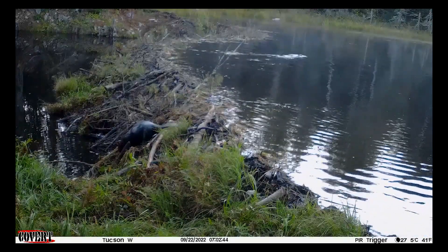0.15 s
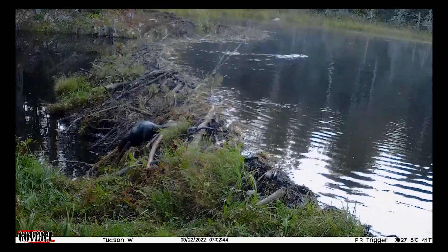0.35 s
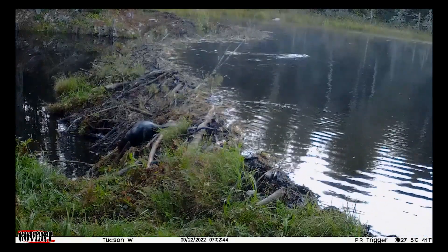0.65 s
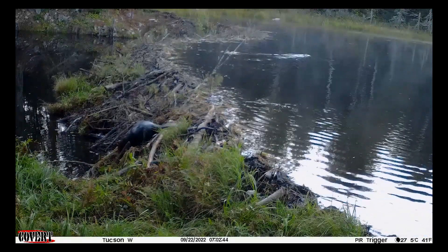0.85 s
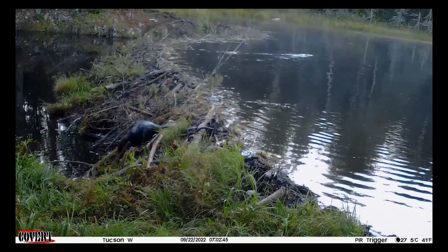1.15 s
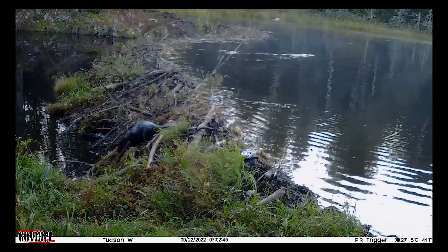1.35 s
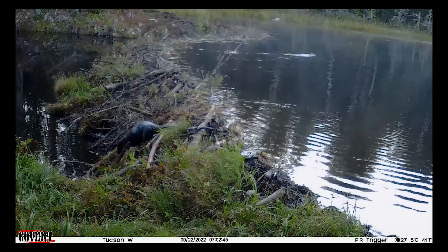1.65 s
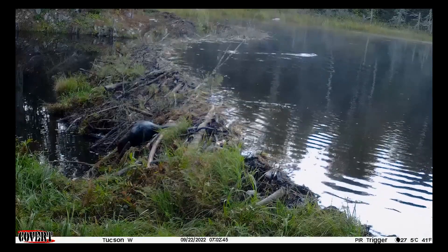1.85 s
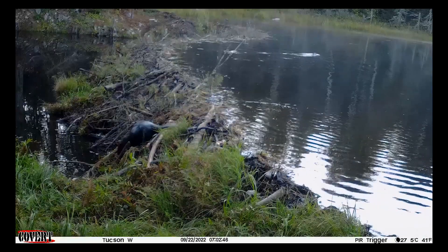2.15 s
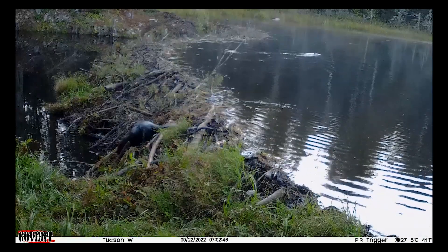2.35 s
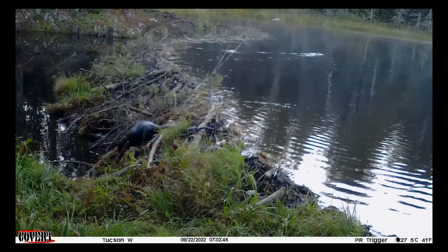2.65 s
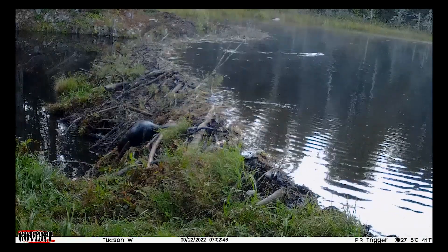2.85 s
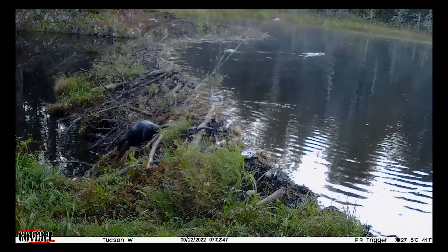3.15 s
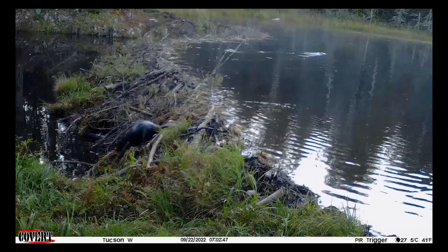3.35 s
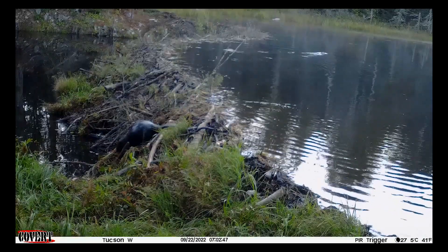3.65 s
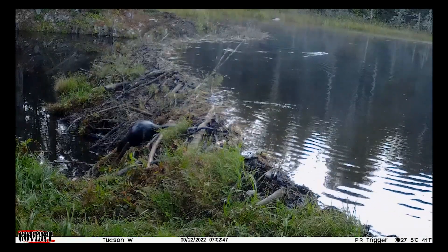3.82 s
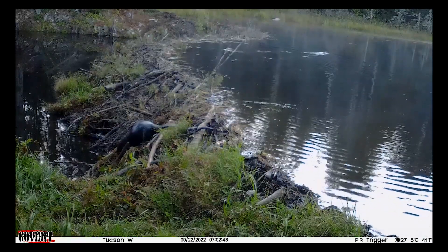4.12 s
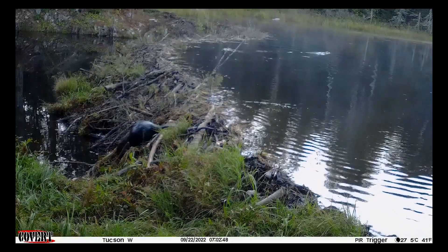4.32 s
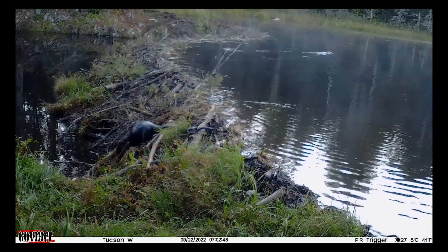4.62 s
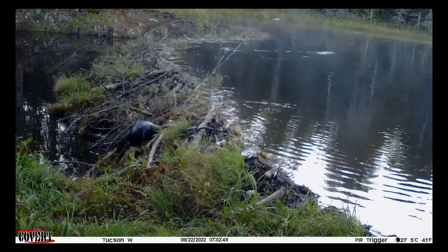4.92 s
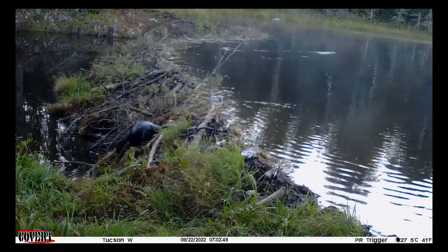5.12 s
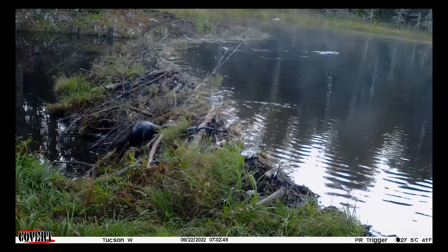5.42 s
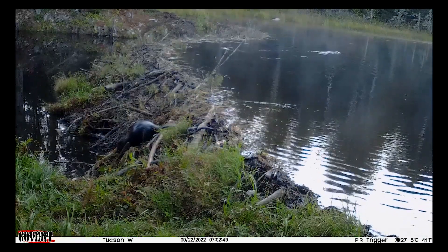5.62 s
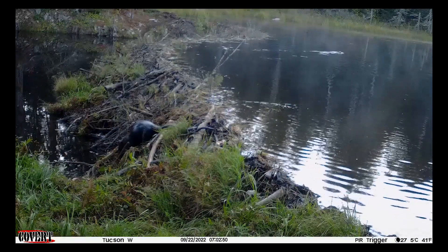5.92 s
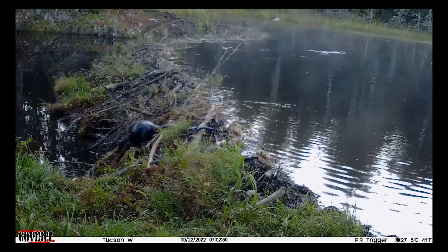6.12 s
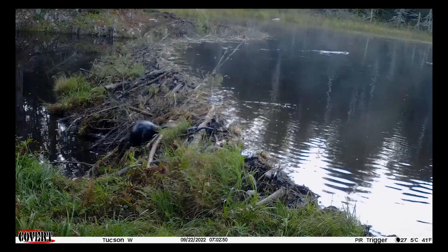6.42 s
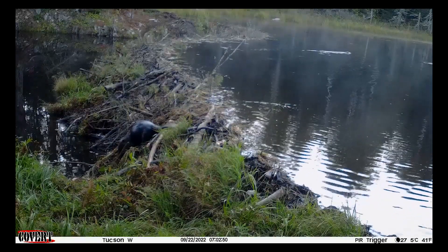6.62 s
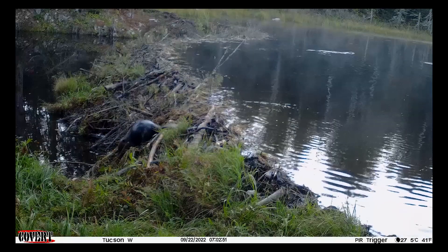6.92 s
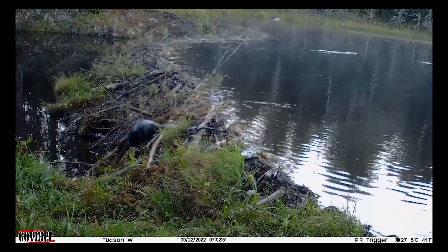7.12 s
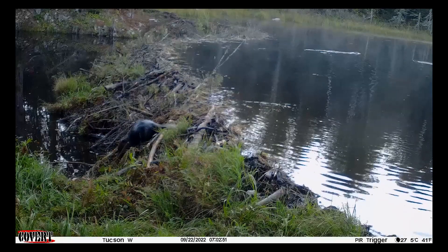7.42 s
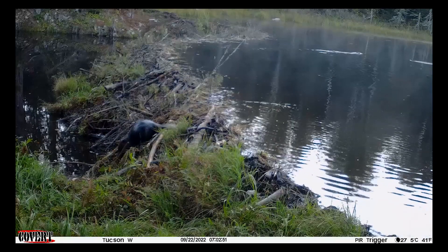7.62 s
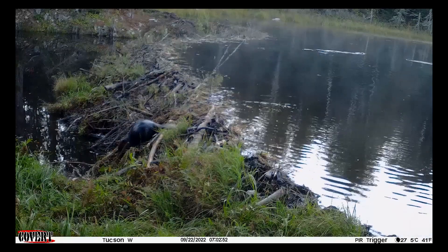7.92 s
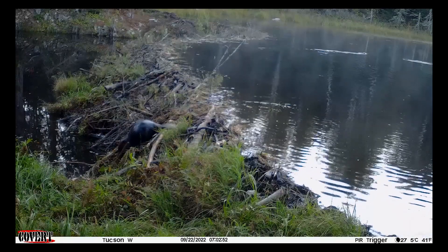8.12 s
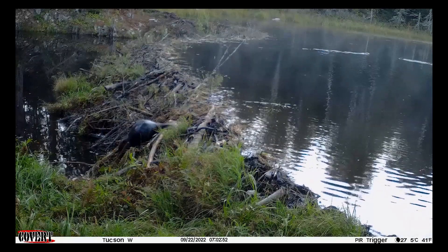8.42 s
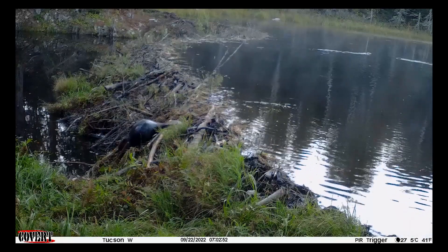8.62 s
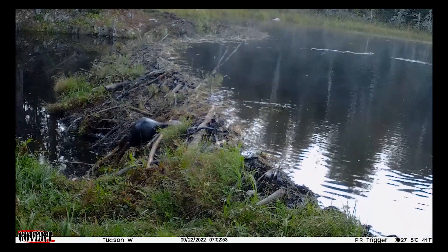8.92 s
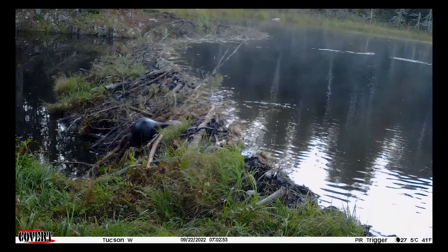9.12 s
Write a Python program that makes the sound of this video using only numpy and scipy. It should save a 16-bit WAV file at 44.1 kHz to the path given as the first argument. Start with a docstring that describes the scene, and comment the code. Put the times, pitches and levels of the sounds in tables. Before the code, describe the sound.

Geese give low growls snapping into sharp honks beside a wooded pond, while tree frogs trill in quick rising chirps over a soft low rumble.

```python
"""Geese growl and honk across a wooded pond while four tree frogs trill in rising chirps.
Goose voices are harmonic series, coloured by throat resonances and roughened by uneven membrane beats.
Frog chirps are short upward glides of three partials, with early echoes from a bank.
The trees return a long diffuse echo, by convolution with decaying random taps.
A low rumble in two layers and a faint hiss, both of shaped noise, lie under all."""
import sys
import numpy as np
from scipy import signal
from scipy.io import wavfile
from scipy.ndimage import uniform_filter1d

SR = 44100
rng = np.random.default_rng(int(sys.argv[2]) if len(sys.argv) > 2 else 0)


def waveform_to_disk(signal):
    """Save audio, clipped to [-1, 1], as 16-bit WAV at the path in sys.argv[1]."""
    frames = np.transpose(np.atleast_2d(signal))
    scaled = np.clip(frames, -1, 1) * 32767
    samples = np.round(scaled).astype(np.int16)
    wavfile.write(sys.argv[1], SR, samples)


N = 408807  # samples

# Low growls, mostly leading into a honk:
# (start t/s, length/s, pitch f/Hz at no rise, pitch f/Hz at full rise, effort level/dB)
GROWLS = [(.01, 0.27, 125.4, 154.1, -50.5), (2.22, .29, 124, 150, -49), (4.63, 0.29, 127, 155.9, -51),
          (6.19, .19, 140.2, 162.3, -49), (7.88, 0.26, 125.7, 150.3, -52)]
# Throat resonances of the growl: (f/Hz, level/dB)
GROWL_THROAT = [(250, -53), (450, -16.5), (600, -17.5), (740, -24.5), (860, -2), (980, 3.5), (1080, -2),
                (1160, -13.5), (1300, 4.5), (1450, -14.5), (1650, -63), (2080, -27), (2600, -51),
                (3900, -23), (5000, -54)]
# Course of every growl:
# (share of length, share of pitch rise, level/dB re effort, brightness/dB per octave)
GROWL_COURSE = [(0, 0.051, -27, -11), (.3, 0.011, -14.5, -3), (.5, .4, -9.5, 1.5), (.82, .8, -4.5, -0.5),
                (.92, 0.93, -1.5, -2.5), (.97, 1, 9, -2), (1, .98, 3, -4)]
GROWL_ROUGH = 0.19  # roughness, 0-1
GROWL_WAVER, GROWL_WAVER_HZ = 0.015, 13.65  # pitch waver: share of the pitch, rate f/Hz

# Honks of the higher goose:
# (start t/s, length/s, reference top pitch f/Hz, pitch arch/Hz, effort level/dB)
HIGH_HONKS = [(.268, .11, 651, 130, -26), (2.46, .08, 581, 14, -39.5), (2.497, 0.12, 656.6, 114, -26),
              (4.908, 0.12, 662, 127, -25.5), (6.345, .085, 674, 70, -45.5), (8.142, 0.089, 641, 47, -27)]
# Throat resonances of the higher goose: (f/Hz, level/dB)
HIGH_THROAT = [(500, -14), (700, -35.5), (1050, -0.5), (1300, 0), (1800, -31.5), (2000, -23.5),
               (2500, -42.5), (3150, -39.5), (3550, -41.5), (3850, -26), (4250, -28.5), (4550, -43.5),
               (5150, -44.5), (6000, -45.5)]
# Course of every high honk: (share of length, share of the arch under the top,
# level/dB re effort, roughness 0-1, brightness/dB per octave)
HIGH_COURSE = [(0, 0.43, -20, 0.4, -5), (.12, 0.397, -8.5, 0.24, 1.5), (.28, 0.16, -0.5, 0.18, 2),
               (.45, 0.0091, -0.5, 0.1, -2.5), (.63, 0.13, -2.5, 0.09, 1.5), (.8, 0.83, -19.5, 0, -7),
               (1, 1.1, -28, .2, -9)]

# Honks of the lower goose, one curve each: (t/s, pitch f/Hz, effort level/dB, roughness 0-1)
LOW_HONKS = [
    [(2.76, 418.7, -35, .1), (2.795, 438.4, -26, .25), (2.82, 446, -24, 0.42), (2.83, 438.5, -34.5, 0.3),
     (2.842, 476, -25, 0.6), (2.848, 480, -29, 0.7)],
    [(2.842, 502, -36, 0.5), (2.858, 521, -31, 0.24), (2.87, 506, -31.5, .25), (2.876, 502, -44, 0.5),
     (2.9, 478, -56, .4)],
    [(6.708, 432, -50, .5), (6.728, 424, -36, 0.4), (6.745, 382, -51, 0.4), (6.79, 354, -63, .1)],
    [(6.859, 442.5, -33, .06), (6.87, 433, -29, 0.15), (6.905, 451.1, -23, 0.15), (6.93, 456, -27, 0.42),
     (6.945, 452, -25, 0.66), (6.96, 432, -38, 0.8), (6.966, 430, -30.5, 0.5), (6.988, 444, -56, .5)],
]
# Partials of the lower goose: (multiple of the pitch, level/dB)
LOW_PARTIALS = [(1, -24.5), (2, 2.5), (3, -22), (4, -34), (5, -27), (6, -26), (7, -27), (8, -22), (9, -23),
                (10, -34), (11, -33), (12, -71), (13, -42.5), (14, -58), (15, -45), (16, -53.5), (17, -50),
                (18, -64), (19, -51), (20, -73)]
# One deep honk: (t/s, pitch f/Hz, effort level/dB, roughness 0-1)
DEEP_HONKS = [
    [(6.63, 307.6, -60, .5), (6.646, 302.4, -43.5, 0.34), (6.694, 310, -41, 0.98),
     (6.725, 322.5, -39.5, 0.69)],
]
# Partials of the deep honk: (multiple of the pitch, level/dB)
DEEP_PARTIALS = [(1, -11), (2, -10.5), (3, -1), (4, -13), (5, -28), (6, -20.5), (7, -17.5), (8, -27),
                 (9, -24), (10, -23.5), (11, -29), (12, -23.5), (13, -34), (14, -30)]
# Brightness/dB per octave that each honk gains at full roughness
LOW_STRAIN_DB = (6.1, 6.5, 2, 1)
DEEP_STRAIN_DB = (2,)

# Soft murmurs with one throat resonance: (start t/s, length/s, first pitch f/Hz, last pitch f/Hz,
# pitch arch/Hz, effort level/dB, resonance f/Hz, share of length at the peak)
MURMURS = [(1.49, 0.25, 131.4, 142, 23.6, -55, 993, 0.65),
           (1.715, 0.051, 174.5, 165.4, 1.5, -51, 1110, 0.35),
           (6.64, 0.092, 102.9, 104, .3, -47, 820, 0.88), (6.783, .045, 101, 106, .3, -53, 860, 0.37),
           (7.045, 0.064, 178.2, 165.8, 1.5, -40.5, 1187, .25)]
MURMUR_WIDTH_HZ, MURMUR_ROUGH = 90, 0.58  # resonance width f/Hz, roughness 0-1
MURMUR_RISE_DB, MURMUR_FALL_DB = -7, -4  # level/dB at the start and end, under the peak
MURMUR_SAG = 0.023  # the resonance sinks by this share
FLUTTER_HZ, FLUTTER_DB = 71.8, 3  # throb of rough partials: rate f/Hz, greatest swing level/dB

# Trills of the near, second, thin and far frog: (opening chirp t/s, second chirp t/s,
# last chirp t/s, chirps after the opening, opening level/dB, peak level/dB)
TRILLS = [
    [(.632, .679, 1.124, 11, -35, -33.5), (3.118, 3.164, 3.613, 11, -34, -34),
     (5.311, 5.359, 5.806, 11, -36.5, -33.5), (8.153, 8.197, 8.644, 11, -32, -33.5)],
    [(.598, .648, 1.171, 11, -42, -43), (5.843, 5.89, 6.47, 12, -40, -42),
     (9.162, 9.216, 9.263, 2, -47.5, -41.5)],
    [(2.351, 2.41, 3.001, 11, -46.5, -45.5), (7.941, 7.999, 8.585, 11, -50, -50)],
    [(3.715, 3.771, 4.205, 9, -56.5, -54.5)],
]
# Opening chirp of each frog: (overtone level/dB, share of the sweep left out at its start)
OPENINGS = [(-12, .4), (-6, .1), (-6.5, 0.104), (-3, .1)]
# Voice of each frog: (start f/Hz, end f/Hz, rise/s, fall/s, level/dB of partials 1-3,
# their change/dB over the sweep, bank echoes as (delay/s, level/dB on partials 1-3),
# level/dB of partials 1-3 toward the trees)
FROG_VOICES = [(848, 1177, .017, 0.004, (1, -6, -27.5), (0, -11, 5.7), ((.0125, -23, -2, -6.5),
               (.024, -20.5, -10, -20)), (-13.5, -9.5, -28)), (843.4, 1080, 0.019, 0.0021, (-2, 0, -17),
               (0, 0, 0), ((.012, -33, -21, -21),), (-2, -7, -35.5)),
               (946, 1140, 0.025, 0.0035, (-6, 0, -26), (0, 0, 0), ((.012, -10, -10, -16),),
               (-13, -9.5, -36)), (884, 1150, 0.018, 0.0055, (0, -11, -30), (0, 0, 0),
               ((.012, -24, -19, -12),), (-5, -6, -38))]
# Vocal sac, acting on the overtones: (f/Hz, level/dB)
VOCAL_SAC = [(1650, -15), (1900, 1.5), (2150, -2.5), (2400, -3.5), (2700, -8.5), (3250, -1.5), (3700, 0)]
SLOWING = 0.04  # the first gaps are about this share shorter than the mean, the last ones longer
CHIRP_SPREAD_DB, OVERTONE_SPREAD_DB = 1, 0.8  # standard deviation/dB from chirp to chirp
BANK_TILT_DB = 14  # the bank returns the top of each sweep's overtones more strongly

# Late decay among the trees: (f/Hz, t60/s)
TREES = [(400, 2.7), (900, 2.38), (1300, 2), (2000, 1.98), (4000, 1.9), (8000, 1)]
# Colour of the tree echo: (f/Hz, level/dB)
TREES_COLOUR = [(400, 3), (900, -5), (1300, -3), (2000, 5.5), (4000, 1), (8000, 4)]
# Far shore: (delay/s, spread/s, level/dB over the scatter of the trees)
SHORE_ECHO = (0.16, 0.015, 1.8)
GEESE_TREES_DB = -7.5  # goose sound sent to the trees, level/dB

# Swells of the rumble: (t/s, upper level/dB, deep level/dB)
RUMBLE_LEVEL = [(0.04, -44.5, -44), (0.06, -42, -47.5), (0.4, -40, -43.5), (1.78, -51.5, -51.5),
                (2.12, -43, -46), (2.88, -47.5, -47.5), (5.37, -47, -46), (5.94, -36.5, -37),
                (5.96, -41, -47.5), (6.48, -46, -40.5), (6.63, -44.5, -48), (7.22, -46.5, -45.5),
                (7.58, -38.5, -40), (7.79, -43.5, -48.5), (8.2, -43.5, -41.5), (9.04, -39.5, -55),
                (9.17, -38.5, -40), (9.25, -42.5, -47)]
# Relative spectrum of the upper rumble: (f/Hz, level/dB per Hz)
RUMBLE = [(41, -34), (70, 3), (151, 0.5), (186, -6.5), (258, -21.5), (400, -34), (520, -51), (880, -120)]
# Relative spectrum of the deep rumble: (f/Hz, level/dB per Hz)
DEEP_RUMBLE = [(7.1, -28), (12, -4.5), (32, 5.5), (70, -2.5), (91, -36), (150, -120)]
# Relative spectrum of the hiss: (f/Hz, level/dB per Hz)
HISS = [(150, -51), (250, -5.5), (324, -9.5), (709, -14), (787, -15.5), (889, -5.5), (936, -7),
        (1300, -14.5), (1520, -20), (2160, -16), (2480, -20), (4100, -19.5), (6790, -23.5), (14800, -24),
        (15900, -27)]
HISS_DB, EDGE_HZ = -61, 15750  # hiss rms level/dB, upper band limit f/Hz


def geese():
    """Superposition: all growls, murmurs and honks add linearly."""
    out = np.zeros(N)
    for calls, voice in ((GROWLS, growl), (MURMURS, murmur), (HIGH_HONKS, high_honk)):
        for start, *call in calls:
            add(out, start, voice(*call))
    low = (LOW_HONKS, LOW_STRAIN_DB, LOW_PARTIALS)
    deep = (DEEP_HONKS, DEEP_STRAIN_DB, DEEP_PARTIALS)
    for honks, strains, partials in (low, deep):
        for rows, strain_db in zip(honks, strains):
            add(out, rows[0][0], honk(rows, strain_db, partials))
    return out


def growl(length, first_hz, last_hz, effort_db):
    """Source and filter: the partials of slow beats slide through a fixed throat."""
    risen, under_db, bright_db = course(GROWL_COURSE, length)
    waver = np.sin(2 * np.pi * (GROWL_WAVER_HZ * np.arange(len(risen)) / SR + rng.random()))
    hz = (first_hz + (last_hz - first_hz) * risen) * (1 + GROWL_WAVER * waver)

    def partial_db(k):
        throat_db = read(GROWL_THROAT, k * hz)
        return effort_db + under_db + throat_db + bright_db * np.log2(k / 7)

    return syrinx(hz, GROWL_ROUGH, partial_db, count=30)


def high_honk(length, top_hz, arch_hz, effort_db):
    """Register break: a pitch about four times the growl's, coloured by a fixed throat."""
    low, under_db, rough, bright_db = course(HIGH_COURSE, length)
    hz = top_hz - arch_hz * low

    def partial_db(k):
        throat_db = read(HIGH_THROAT, k * hz)
        return effort_db + under_db + throat_db + bright_db * np.log2(max(k / 2, 1))

    return syrinx(hz, rough, partial_db, count=9)


def honk(rows, strain_db, partials):
    """Spectral tilt under strain: roughness of the voice also lifts its upper partials."""
    hz, effort_db, rough = columns(rows)
    top = max(db for _, db in partials)

    def partial_db(k):
        tilt_db = strain_db * rough * np.log2(max(k / 2, 1))
        return effort_db + partials[k - 1][1] - top + tilt_db

    return syrinx(hz, rough, partial_db, count=len(partials))


def murmur(length, first_hz, last_hz, arch_hz, effort_db, throat_hz, peak):
    """Single resonance: slow beats stand out only near it, and fall fastest above it."""
    u = np.arange(0, length, 1 / SR) / length
    hz = first_hz + (last_hz - first_hz) * u + arch_hz * np.sin(np.pi * u)
    centre_hz = throat_hz * (1 - MURMUR_SAG * u)
    rise_db = MURMUR_RISE_DB * (1 - u / peak) ** 2
    fall_db = MURMUR_FALL_DB * ((u - peak) / (1 - peak)) ** 2
    level_db = effort_db + np.where(u < peak, rise_db, fall_db)

    def partial_db(k):
        off = (k * hz - centre_hz) / MURMUR_WIDTH_HZ
        resonance_db = -12 * np.log10(1 + off ** 2)
        return level_db + resonance_db + 1.4 * np.minimum(off, 0) - 3 * np.maximum(off, 0)

    return syrinx(hz, MURMUR_ROUGH, partial_db, count=16)


def syrinx(hz, rough, partial_db, count):
    """Harmonic series: uneven membrane beats blur and throb high partials and leave low ones clear."""
    turns, out = np.cumsum(hz) / SR, 0
    flutter = np.cos(2 * np.pi * (FLUTTER_HZ * np.arange(len(hz)) / SR + rng.random()))
    for k in range(1, count + 1):
        wobble = rng.standard_normal((2, len(hz)))
        wobble = evened(uniform_filter1d(uniform_filter1d(wobble, size=60), size=60))
        share = np.clip(rough * (k * hz / 3000) ** 1.95, 0, 1)  # random part of the partial
        shaky = np.sqrt(1 - share ** 2) + share * (wobble[0] + 1j * wobble[1]) / np.sqrt(2)
        level = gain_of(partial_db(k) + FLUTTER_DB * share * flutter)
        out = out + level * (shaky * np.exp(2j * np.pi * (k * turns + rng.random()))).real
    edges = .01 * SR  # both tapers together, in samples
    return np.sqrt(2) * out * signal.windows.tukey(len(hz), edges / len(hz))


def course(shape, length):
    """Similarity in time: one course is stretched over a call's length."""
    share, *values = np.transpose(shape)
    u = np.arange(0, length, 1 / SR) / length
    return [np.interp(u, share, v) for v in values]


def columns(rows):
    """Linear interpolation: curves are spread over the samples that they span."""
    s, *values = np.transpose(rows)
    t = np.arange(s[0], s[-1], 1 / SR)
    return [np.interp(t, s, v) for v in values]


def frog(chirps, start_hz, end_hz, rise, fall, partials_db, slopes_db, echoes, trees_db):
    """Swept partials and early reflection: chirps swell upward, stop short and return off the bank.

    Returns the near sound and the sound sent to the trees."""
    near, sent, t = np.zeros(N), np.zeros(N), np.arange(0, rise + fall, 1 / SR)
    swell = np.sin(np.pi / 2 * t / rise) ** 1.03
    stop = np.cos(np.pi / 2 * (t - rise) / fall)
    shape = np.where(t < rise, swell, stop)
    sweep = t / t[-1]
    for (s, db, overtones_db, skipped), pitch in zip(chirps, rng.standard_normal(len(chirps))):
        hz = (start_hz + (end_hz - start_hz) * sweep) * (1 + .008 * pitch)
        # the exponent leaves the gate open where nothing is skipped
        gate = np.clip((sweep - skipped) * 8, 0, 1) ** (skipped > 0)
        for k in range(3):
            colour_db = overtones_db + read(VOCAL_SAC, (k + 1) * hz) if k else 0
            level = gain_of(db + colour_db + slopes_db[k] * (sweep - .5))
            partial = level * shape * gate * np.sin(2 * np.pi * (k + 1) * np.cumsum(hz) / SR)
            add(near, s - 0.63 * rise, gain_of(partials_db[k]) * partial)
            add(sent, s - .7 * rise, gain_of(trees_db[k]) * partial)
            tilt_db = BANK_TILT_DB * min(k, 1) * (sweep - 1.0)
            for delay, *echo_db in echoes:
                echo = gain_of(partials_db[k] + echo_db[k] + tilt_db) * partial
                add(near, s - 0.76 * rise + delay, echo)
    return near, sent


def trill(opening_s, second_s, last_s, chirps, opening_db, peak_db, dull_db, skipped):
    """Pulse train: an opening chirp, then a slowing run.

    Rows are (t/s, peak level/dB, overtone level/dB, share of the sweep left out)."""
    u = np.linspace(0, 1, round(chirps))
    times = second_s + (last_s - second_s) * (u - SLOWING * u * (1 - u))
    level, tone = rng.standard_normal((len(u), 2)).T
    levels_db = peak_db + CHIRP_SPREAD_DB * level
    run = zip(times, levels_db, OVERTONE_SPREAD_DB * tone, 0 * u)
    return [(opening_s, opening_db, dull_db, skipped), *run]


def trees(x):
    """Diffuse reverberation: sparse taps of random sign, each band dying at its own speed."""
    taps = np.zeros(2 * SR)
    at = np.arange(400, 2 * SR - 20, 20)
    taps[at + rng.integers(0, 20, len(at))] = rng.choice([-1., 1.], len(at))
    hz, t, z = signal.stft(taps, SR, nperseg=256)
    late = gain_of(-60 * t / read(TREES, hz)[:, None])
    near_scatter = 4.5 * gain_of(-60 * t / 0.17)  # stronger, with t60 = 0.17 s
    delay, spread, shore_db = SHORE_ECHO
    shore = gain_of(shore_db * np.exp(-((t - delay) / spread) ** 2))
    fading = (late + near_scatter) * shore
    colour = gain_of(read(TREES_COLOUR, hz))[:, None]
    tail = signal.istft(z * fading * colour, SR, nperseg=256)[1]
    return signal.fftconvolve(x, tail / np.linalg.norm(tail))[:N]


def rumble():
    """Modulated noise: two low bands that swell in lumps."""
    s, upper_db, deep_db = np.transpose(RUMBLE_LEVEL)
    t = np.arange(N) / SR
    upper = gain_of(np.interp(t, s, upper_db)) * noise(RUMBLE, patchy_db=1.5)
    deep = gain_of(np.interp(t, s, deep_db)) * noise(DEEP_RUMBLE, patchy_db=-0.5)
    return upper + deep


def noise(spectrum, patchy_db):
    """Gaussian noise: random short-time spectra with drifting patches, scaled to rms 1."""
    frames, hz = N // 512 + 5, np.fft.rfftfreq(2048, 1 / SR)
    a, b, patches = rng.standard_normal((frames, 1025, 3)).T
    patches = uniform_filter1d(patches, size=8, axis=0)
    patches = evened(uniform_filter1d(patches, size=8, axis=1))
    z = (a + 1j * b) * gain_of(read(spectrum, hz)[:, None] + patchy_db * patches)
    return evened(signal.istft(z, nperseg=2048, noverlap=1536)[1][:N])


def gain_of(db):
    """Logarithmic level: decibels to amplitude."""
    return 10 ** (np.asarray(db) / 20)


def evened(x):
    """Mean power: scales to rms 1."""
    return x / np.sqrt(np.mean(np.abs(x) ** 2) + 1e-20)


def read(points, hz):
    """Logarithmic frequency scale: reads a spectrum by interpolation."""
    f, value = np.transpose(points)
    return np.interp(np.log(hz + 1), np.log(f + 1), value)


def add(mix, s, sound):
    """Linear superposition: mixes a sound in at time s."""
    part = mix[max(round(s * SR), 0):][:len(sound)]
    part += sound[:len(part)]


def scene():
    """Direct and reflected sound: geese and frogs with their echoes over the rumble."""
    dry = geese()
    sent = gain_of(GEESE_TREES_DB) * dry
    for trills, opening, voice in zip(TRILLS, OPENINGS, FROG_VOICES):
        chirps = [chirp for row in trills for chirp in trill(*row, *opening)]
        near, far = frog(chirps, *voice)
        dry, sent = dry + near, sent + far
    return (dry + trees(sent) + rumble())[None]


def record(dry):
    """Noise floor and finite bandwidth: adds the hiss, then a low-pass filter."""
    hissing = dry + gain_of(HISS_DB) * noise(HISS, patchy_db=2.0)
    low_pass = signal.firwin(511, EDGE_HZ, window=("kaiser", 9), fs=SR)
    return signal.oaconvolve(hissing, low_pass[None], "same")


dry = scene()
out = record(dry)
waveform_to_disk(out)
```